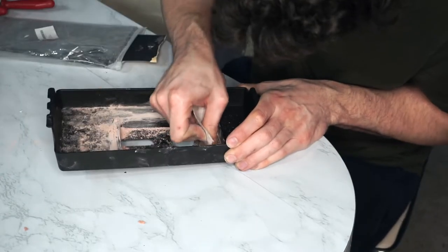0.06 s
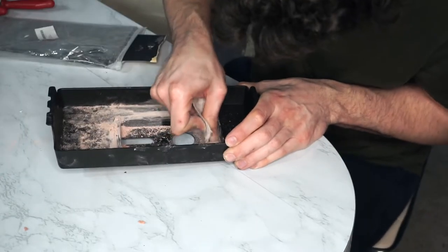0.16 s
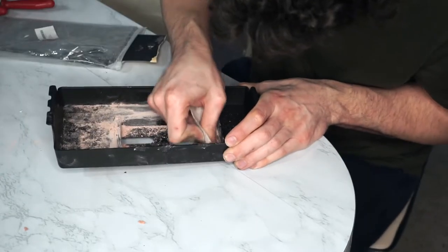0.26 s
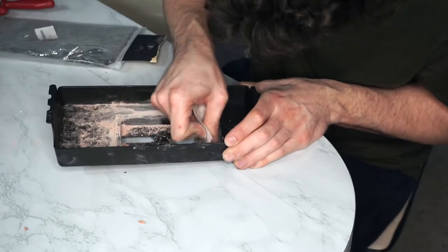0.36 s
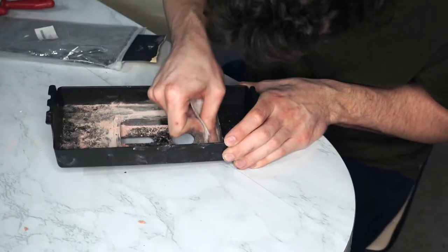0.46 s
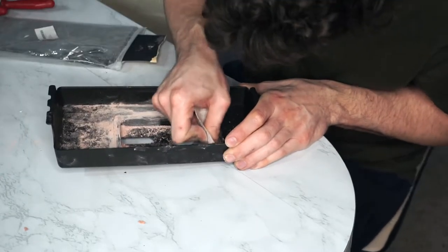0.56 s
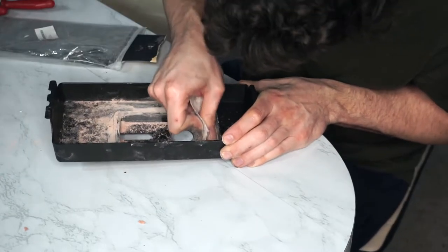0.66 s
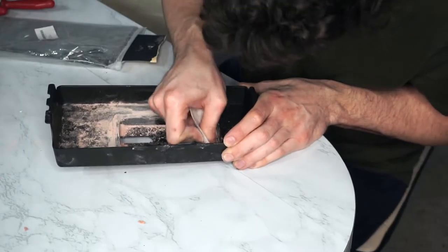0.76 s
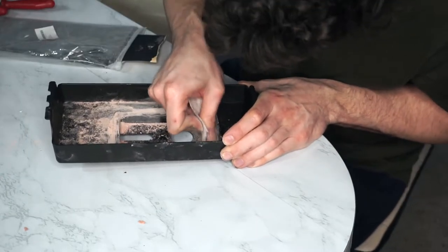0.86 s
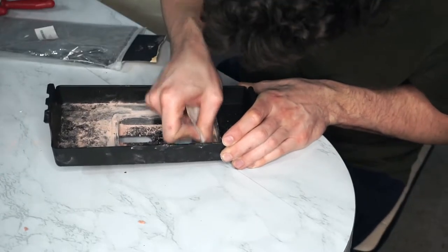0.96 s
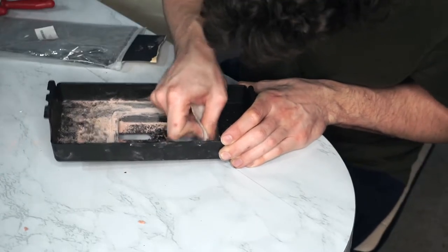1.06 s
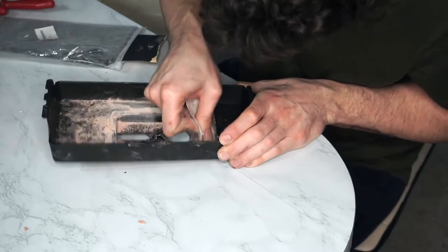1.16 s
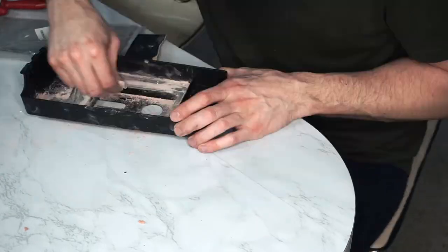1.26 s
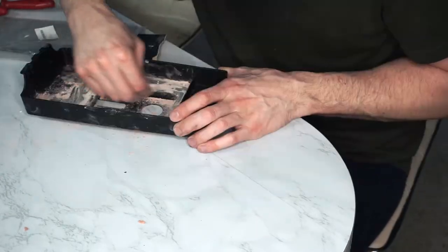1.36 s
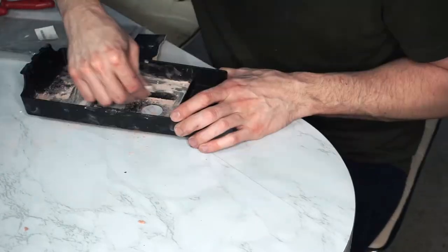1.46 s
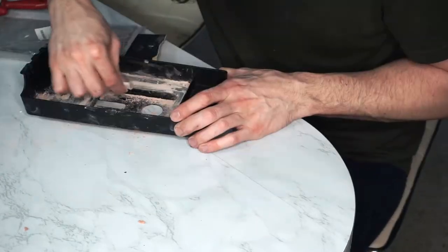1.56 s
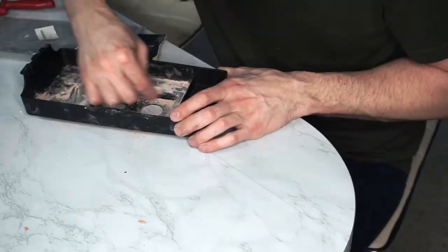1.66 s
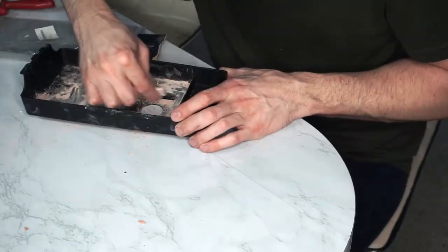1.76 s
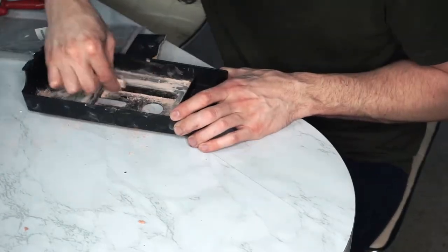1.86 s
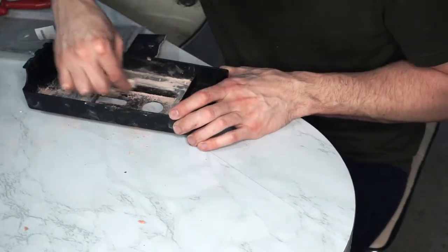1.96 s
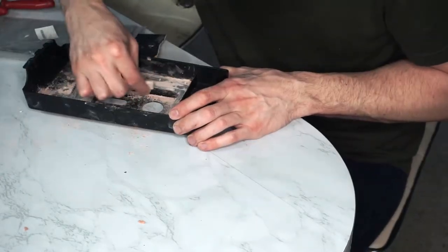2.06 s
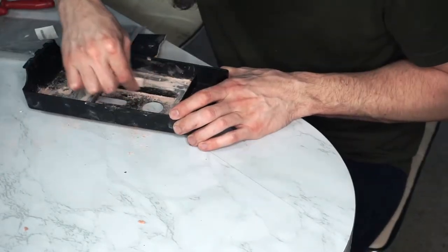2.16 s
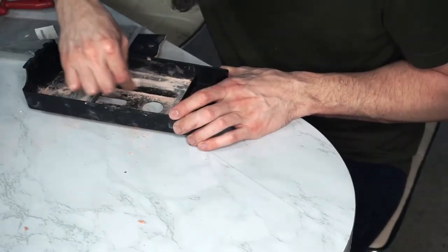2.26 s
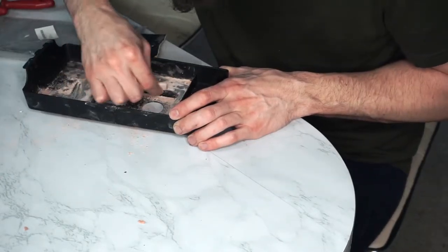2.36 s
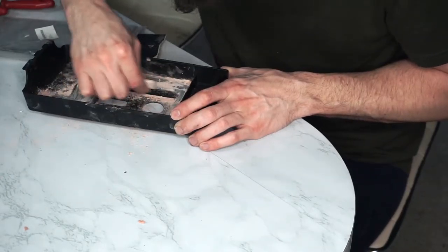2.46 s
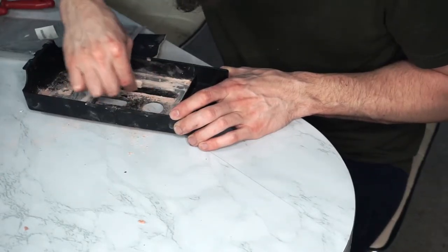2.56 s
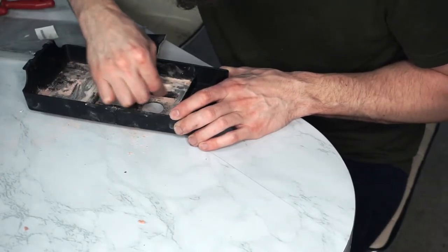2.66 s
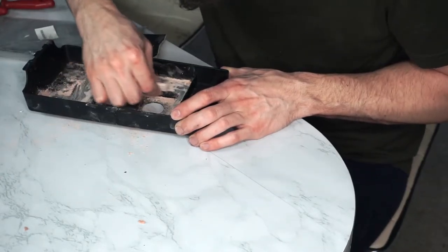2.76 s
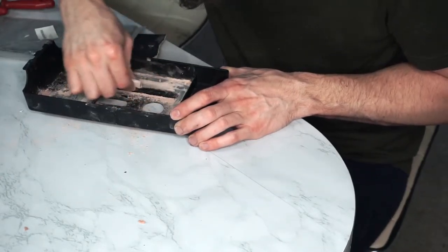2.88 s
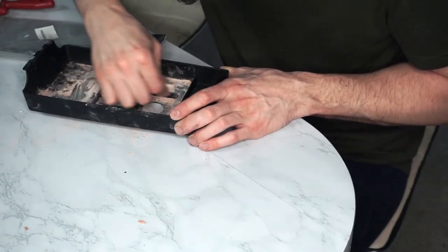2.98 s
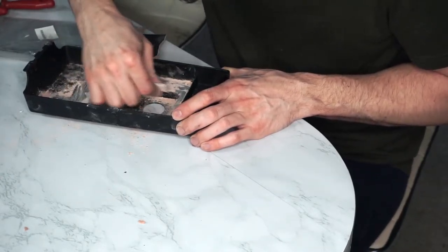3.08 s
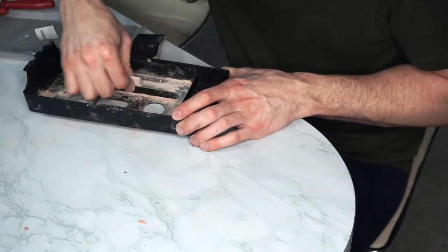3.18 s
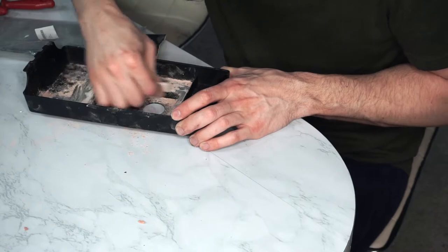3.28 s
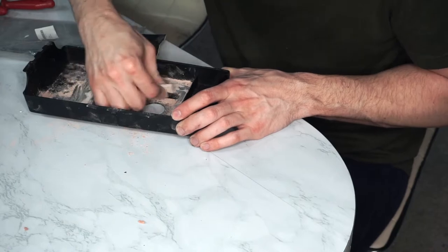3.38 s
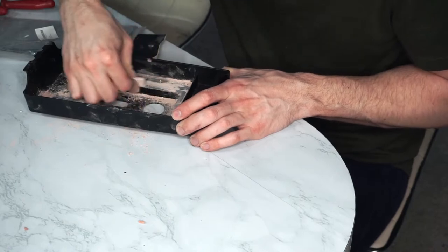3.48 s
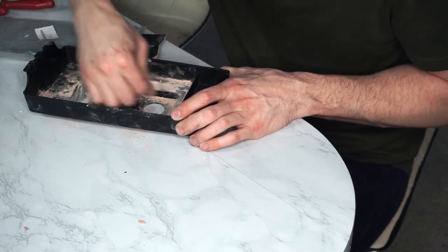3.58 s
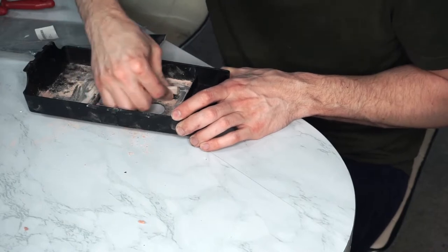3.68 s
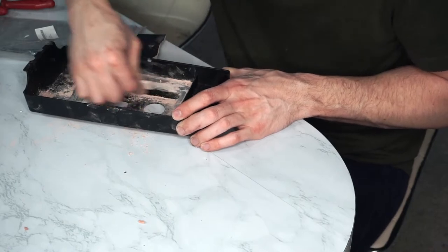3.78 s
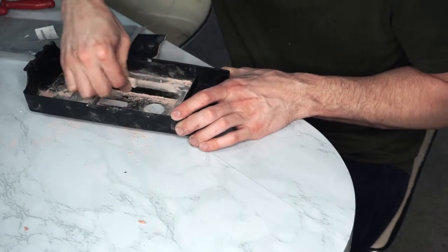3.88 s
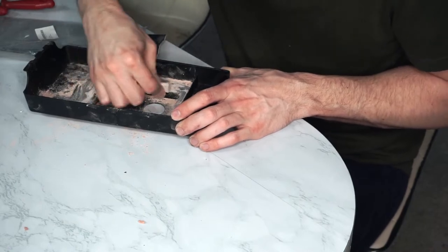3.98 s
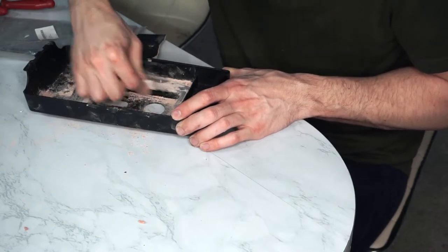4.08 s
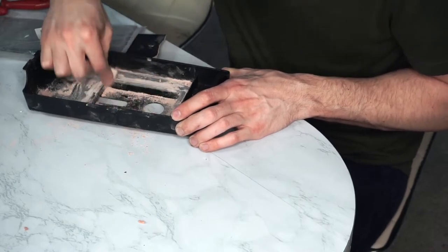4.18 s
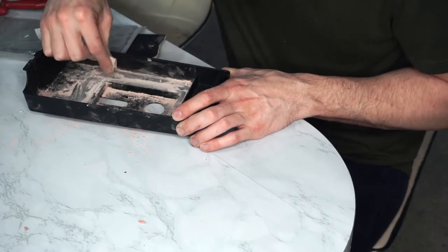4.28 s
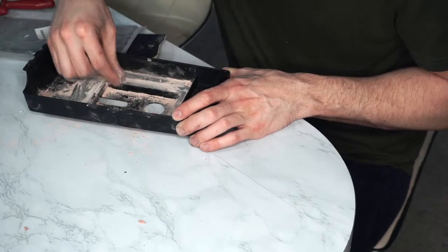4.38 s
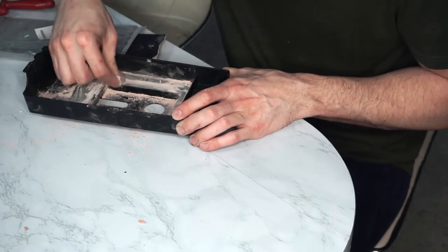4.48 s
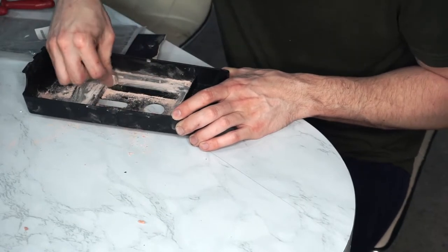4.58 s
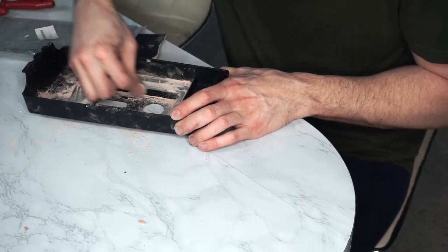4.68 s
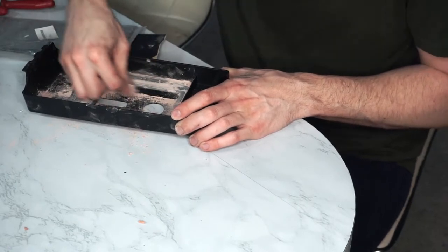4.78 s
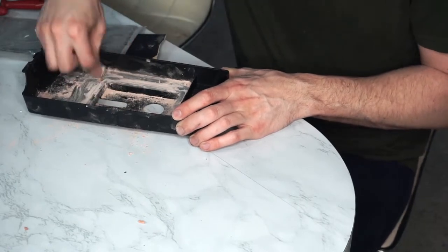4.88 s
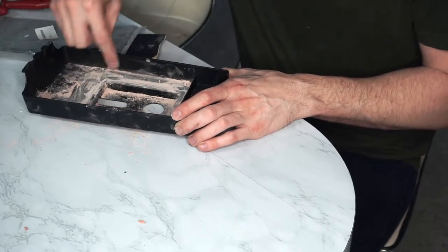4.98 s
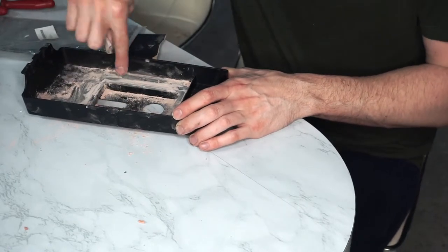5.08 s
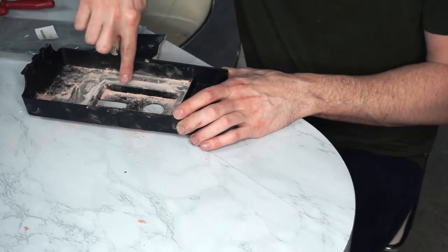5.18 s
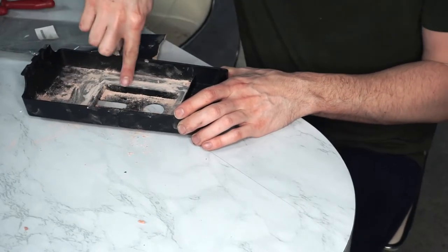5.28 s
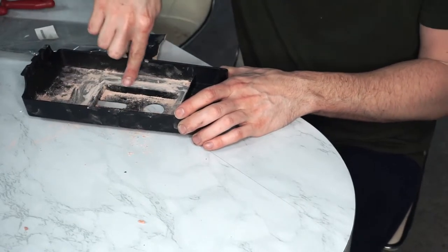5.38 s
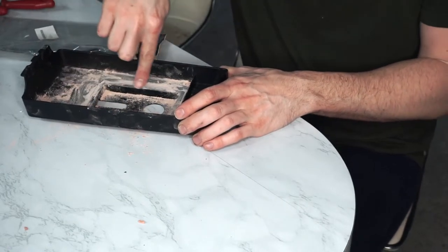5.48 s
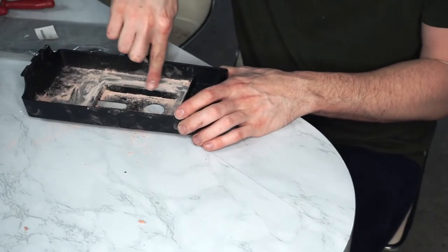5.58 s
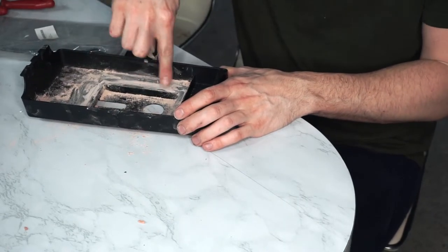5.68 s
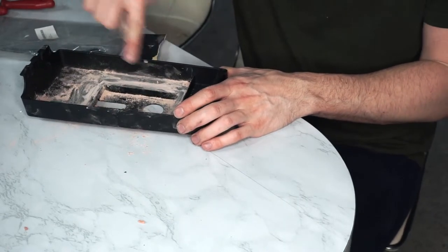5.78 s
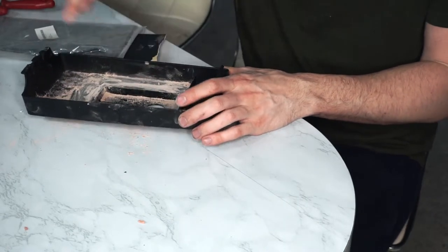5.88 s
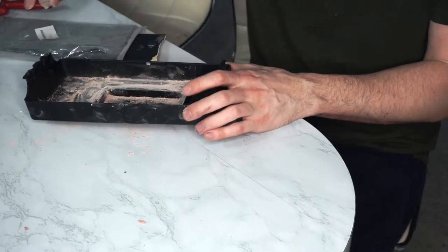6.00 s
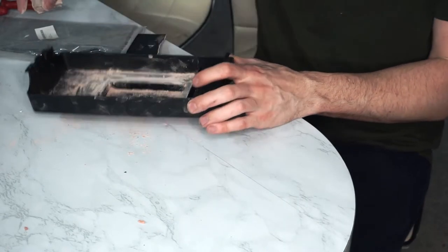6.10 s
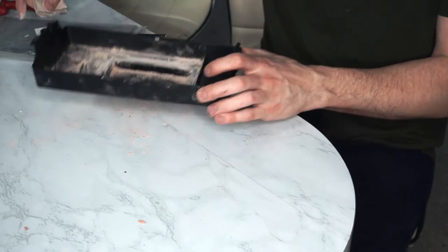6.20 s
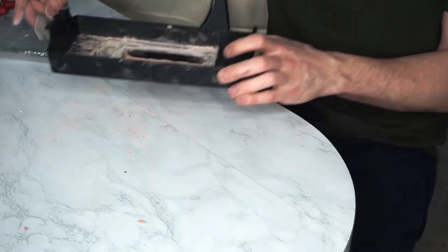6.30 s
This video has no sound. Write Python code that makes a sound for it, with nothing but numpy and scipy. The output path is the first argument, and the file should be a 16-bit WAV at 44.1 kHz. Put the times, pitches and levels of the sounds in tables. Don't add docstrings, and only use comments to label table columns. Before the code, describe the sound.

Sandpaper scrubs hard filler inside a thin plastic tray on a tabletop, miked closely. Light, quick scratches come first; a momentary dip leads to fuller, harsher to-and-fro rasping that rings the tray around a hollow midrange note. The tray grinds and bumps softly on the table. After a pause and a final pair of strokes, only tiny ticks, whispering fingertip slips and low room tone remain.

```python
import sys
import numpy as np
from scipy import signal
from scipy.fft import rfft, irfft
from scipy.io import wavfile
from scipy.ndimage import uniform_filter1d

SR = 44100
rng = np.random.default_rng(int(sys.argv[2]) if len(sys.argv) > 2 else 0)


def dump_mix(stems):
    frames = np.atleast_2d(stems).T
    limited = np.clip(frames, -1, 1)
    pcm = np.round(limited * 32767).astype(np.int16)
    wavfile.write(sys.argv[1], SR, pcm)


def voltage_ratio(decibels):
    exponent = np.asarray(decibels, float) / 20
    return 10 ** exponent


N = 279580
TIME = np.arange(N) / SR
TURN_S = 1.285
HUM_HZ = 60.3

# start in seconds, length in seconds, rasp level in dB,
# lean (under 1 starts fast), tray ring in dB.
SHORT_STROKES = [
    (0.019, 0.067, -44, 0.68, -16),
    (0.123, 0.088, -47, 1.5, -10),
    (0.24, 0.091, -38.5, 1.34, -13),
    (0.362, 0.096, -42, 1.45, -12),
    (0.499, 0.074, -39.5, 0.85, -9),
    (0.617, 0.081, -40, 1.08, -14),
    (0.741, 0.068, -38, 0.7, -11),
    (0.852, 0.066, -42, 0.95, -16),
    (0.97, 0.074, -36, 0.77, -5),
    (1.0965, 0.075, -36, 0.3, -3),
]
# start in seconds, length in seconds, rasp level in dB,
# lean (under 1 starts fast), tray ring in dB.
LONG_STROKES = [(1.319, 0.12, -32.5, 0.81, -7), (1.456, 0.14, -33.5, 1.18, -8),
                (1.62, 0.15, -29.5, 0.64, -14), (1.746, 0.21, -31.5, 0.76, -14),
                (1.92, 0.17, -35.5, 0.92, -3.5), (2.119, 0.12, -39, 1.04, -6),
                (2.288, 0.14, -33.5, 0.48, -6.5), (2.42, 0.15, -32, 1.17, -4.5),
                (2.571, 0.16, -33, 1, -12.5), (2.764, 0.14, -32, 0.88, -7.5),
                (2.915, 0.14, -30.5, 0.77, -13), (3.054, 0.17, -28.5, 1.13, -9),
                (3.253, 0.1, -29.5, 0.74, -10), (3.383, 0.15, -28.5, 1.18, -9.5),
                (3.57, 0.12, -31, 0.79, -13), (3.721, 0.16, -27, 1.22, -18),
                (3.915, 0.097, -28, 1.34, -12.5), (4.066, 0.17, -27.5, 0.79, -11.5),
                (4.417, 0.024, -44.5, 0.8, -28), (4.504, 0.1, -52, 1.8, -24),
                (4.625, 0.14, -30.5, 0.81, -14.5), (4.761, 0.17, -30, 1.11, -12)]
BAND_EDGES = [500, 1400, 2600, 3800, 5200, 7000, 9500, 12500, 17000]


def unit(x):
    return x / np.sqrt(np.mean(x ** 2))


def butter(x, order, hz, kind="low"):
    return signal.sosfilt(signal.butter(order, hz, kind, fs=SR, output="sos"), x)


def colour(x, points):
    hz, db = np.transpose(points)
    grid = np.maximum(np.arange(2049) * SR / 4096, 1)
    cepstrum = irfft(np.log(voltage_ratio(np.interp(np.log(grid), np.log(hz), db))))
    cepstrum[1:2048] *= 2
    cepstrum[2049:] = 0
    return signal.fftconvolve(x, irfft(np.exp(rfft(cepstrum))))[:len(x)]


def ring(x, hz, width):
    return signal.lfilter(*signal.iirpeak(hz, hz / width, fs=SR), x)


def walk(rate):
    hold = int(SR / rate)
    steps = np.repeat(rng.standard_normal(N // hold + 1), hold)
    return 1.716 * uniform_filter1d(steps, hold)[:N]


def body(x, modes, patchy_db=0.0):
    out = np.zeros(N)
    for k, (hz, width, db) in enumerate(modes):
        contact = voltage_ratio(patchy_db * np.minimum(walk(26), 1.2))
        out += (-1) ** k * voltage_ratio(db) * ring(x * contact, hz, width)
    return out


def curve(table):
    s, *columns = np.transpose(table)
    return [voltage_ratio(np.interp(TIME, s, c, left=-150, right=-150)) for c in columns]


def grit(scatter_db):
    size_db = scatter_db * np.minimum(rng.exponential(size=N), 3.5)
    return unit(rng.standard_normal(N) * voltage_ratio(size_db))


def tail(t60):
    t = np.arange(SR // 2) / SR
    h = rng.standard_normal(len(t)) * voltage_ratio(-60 * t / t60)
    return h / np.sqrt(np.sum(h ** 2))


def add(out, s, piece):
    i = int(s * SR)
    out[i:i + len(piece)] += piece[:N - i]


def patches(parts, patchy_db, rate, ceiling):
    out = np.zeros(N)
    for k, edge in enumerate(zip(BAND_EDGES, BAND_EDGES[1:])):
        wander = voltage_ratio(patchy_db * np.minimum(walk(rate), ceiling))
        out += (-1) ** k * butter(parts[k] * wander, 2, edge, "band")
    return out


def tray(push, before=None, after=None, patchy_db=0.0):
    # Hz, width in Hz, level in dB.
    first_modes = [(577, 17, -17), (1200, 74, 3), (1576, 83, 4.5), (1850, 274, 6.5), (2045, 400, 2)]
    turned_modes = [(706, 175, -6.5), (975, 126, -1.5), (1168, 132, 3.5), (1311, 106, 1.5), (1435, 48, -4),
                    (1550, 180, -5.5), (2176, 185, -5.5), (2400, 190, -18.5)]
    before = first_modes if before is None else before
    after = turned_modes if after is None else after
    first = np.arange(N) < TURN_S * SR
    return body(push * first, before, patchy_db) + body(push * ~first, after, patchy_db)


def air():
    # Hz, density in dB per Hz.
    room_tone = [(18, -53), (30, -23), (98, -20), (125, -4), (479, -4), (561, 0), (622, -3), (1200, -8),
                 (1870, -17), (4910, -21), (9940, -29), (13300, -33), (15500, -36)]
    # Hz, gain in dB.
    side_tilt = [(60, -4), (110, -18.5), (200, -14.5), (380, -10), (700, -11), (1290, -15.5), (2380, -2),
                 (4400, -1.5), (8120, -2), (15000, 1)]
    # Hz, level in dB.
    whine_tones = [(9711, -90), (12947, -90)]
    level_db = -62
    mid = unit(colour(rng.standard_normal(N), room_tone)) * voltage_ratio(level_db + 0.39 * walk(4.7))
    side = colour(unit(colour(rng.standard_normal(N), room_tone)) * voltage_ratio(level_db), side_tilt)
    whine = sum(voltage_ratio(db) * np.sin(2 * np.pi * hz * TIME) for hz, db in whine_tones)
    whine *= 1 + np.sin(2 * np.pi * HUM_HZ * TIME)
    return mid + whine, side


def shoves():
    # time in seconds, scrape in dB, table rumble in dB.
    hold_weight = [
        (0, -50, -60.5),
        (1.26, -49, -64.5),
        (1.29, -60, -79),
        (1.33, -42, -62.5),
        (2.7, -46.5, -65.5),
        (3.1, -44.5, -66),
        (3.6, -56, -65.5),
        (5.0, -55, -60.5),
        (6.3, -72, -94),
    ]
    # time in seconds, scrape in dB, table rumble in dB.
    shove_peaks = [(0.04, -48, -70), (0.16, -52, -72), (0.281, -41, -66), (0.549, -38.5, -62),
                   (0.788, -41, -62), (0.99, -35.5, -64), (1.16, -77, -52.5), (1.37, -45, -59),
                   (1.52, -66, -53), (1.68, -38.5, -52), (1.872, -38, -68), (2.03, -56, -59),
                   (2.19, -42.5, -68), (2.37, -51, -56), (2.52, -57, -73), (2.68, -41, -65),
                   (2.82, -57, -60), (3.0, -43, -63), (3.1, -52, -66), (3.309, -39.5, -77),
                   (3.42, -37, -74), (3.65, -42, -70), (3.758, -38, -69), (3.98, -50, -62), (4.1, -41, -66),
                   (4.45, -46, -50), (4.87, -46, -69)]
    rise_s, fall_s = 0.021, 0.015
    scrape, rumble = curve(hold_weight)
    for s, scrape_db, rumble_db in shove_peaks:
        bump = np.exp(-np.where(TIME < s, (s - TIME) / rise_s, (TIME - s) / fall_s))
        scrape = scrape + voltage_ratio(scrape_db) * bump
        rumble = rumble + voltage_ratio(rumble_db) * bump
    return scrape, rumble


def shuffle():
    # Hz, width in Hz, level in dB.
    table_modes = [(73.6, 14, -23), (133, 14, -0.5), (150, 20, -2), (190.3, 14, 0.5)]
    underside = [(309, 92, -4.0), (444.0, 61, 2.5), (550.0, 152, 5.5), (662, 395, 0.5)]  # Hz, width Hz, dB
    scrape, rumble = shoves()
    grind = body(grit(scatter_db=0.5), underside, patchy_db=3.0)
    boom = body(rng.standard_normal(N), table_modes)
    hum_db = -75 - 2.5 * TIME + walk(3.4)
    hum = voltage_ratio(hum_db) * np.sin(2 * np.pi * HUM_HZ * TIME)
    return voltage_ratio(-6.0) * scrape * unit(grind) + voltage_ratio(-8.5) * rumble * unit(boom) + hum


def wipe():
    # time in seconds, low ring in dB, high ring in dB, hiss in dB.
    finger_path = [
        (5.43, -75, -85, -78),
        (5.464, -57, -58.5, -69),
        (5.505, -62, -70, -77),
        (5.56, -60, -56, -70),
        (5.6, -63, -75, -88),
        (5.66, -53, -59, -57),
        (5.692, -83, -77, -80),
        (5.71, -72, -96, -70),
    ]
    low, high, hiss = curve(finger_path)
    slip = grit(scatter_db=2.5) * voltage_ratio(1.5 * walk(70))
    low_ring = unit(ring(ring(slip, 1180, 150), 1180, 160))
    high_ring = unit(ring(ring(slip, 2170, 300), 2170, 300))
    skin_hiss = unit(ring(ring(slip, 3400, 2600), 3900, 2600))
    return low * low_ring + high * high_ring + hiss * skin_hiss


def brush():
    # time in seconds, level in dB.
    brush_path = [
        (4.522, -72),
        (4.54, -50.5),
        (4.555, -45),
        (4.566, -40),
        (4.572, -47),
        (4.579, -42),
        (4.587, -40.5),
        (4.594, -60),
        (4.625, -68),
    ]
    # Hz, width in Hz, level in dB.
    rim_modes = [(3120, 350, 0.5), (3900, 330, -6), (4800, 390, -1.5), (6200, 390, 1.5), (7500, 600, -9),
                 (9650, 580, -6), (10900, 700, -14)]
    thin = butter(body(grit(scatter_db=5.0), rim_modes), 4, 2700, "high")
    return curve(brush_path)[0] * unit(thin)


def ticks():
    # time in seconds, peak in dB, pitch in Hz.
    tick_events = [(1.449, -46, 11000), (1.4575, -47, 10500), (1.47, -43, 11500), (1.496, -42, 12000),
                   (5.656, -54, 4400), (5.713, -55, 5700), (5.462, -50, 2150), (5.1198, -47, 6600),
                   (5.1304, -48, 4740), (5.1855, -39.5, 5080), (5.7414, -47, 6560), (5.8321, -51, 3520),
                   (5.99, -43, 5070), (6.2706, -55, 4800), (6.278, -49, 5170)]
    out, t = np.zeros(N), np.arange(500) / SR
    for s, db, hz in tick_events:
        click = 0.97 * rng.standard_normal(500) * np.exp(-t / 0.0013)
        pair = np.sin(2 * np.pi * hz * t) + 0.73 * np.sin(2 * np.pi * 1.245 * hz * t)
        envelope = np.exp(-t / 0.0022) * (1 - np.exp(-t / 0.00034))
        add(out, s, voltage_ratio(db - 6.5) * (pair + click) * envelope)
    return out


def knocks():
    # time in seconds, peak in dB, pitch in Hz, t60 in seconds, tray ring in dB.
    knock_events = [(0.974, -31.5, 1850, 0.026, 19.5), (1.098, -27, 1600, 0.04, 1),
                    (1.872, -20, 991, 0.049, 15), (1.877, -16.5, 1210, 0.014, 18.5),
                    (4.192, -46, 1200, 0.049, -19), (4.4315, -13, 450, 0.015, 5),
                    (4.431, -30, 994, 0.048, 1), (4.45, -44, 1000, 0.08, 14), (4.861, -27, 1310, 0.027, 13),
                    (4.877, -21, 880, 0.015, -3), (4.94, -29, 1420, 0.019, 0),
                    (6.326, -39, 1860, 0.022, -1)]
    note, jolt, t = np.zeros(N), np.zeros(N), np.arange(5000) / SR
    for s, db, hz, t60, ring_db in knock_events:
        hollow = np.sin(2 * np.pi * hz * t) + 0.5 * np.sin(2 * np.pi * 1.37 * hz * t)
        add(note, s, voltage_ratio(db - 2.5 - 60 * t / t60) * hollow * (1 - np.exp(-t / 0.0013)))
        slap = uniform_filter1d(rng.standard_normal(5000), size=11) * np.exp(-t / 0.0013)
        add(jolt, s, voltage_ratio(db + ring_db) * slap)
    return butter(note, 1, 80, "high") + tray(jolt)


def chatter():
    # time in seconds, level in dB,
    # width in seconds.
    chatter_swells = [(1.018, -39.5, 0.059), (1.12, -51.5, 0.043), (1.396, -43, 0.038), (1.513, -35, 0.03),
                      (1.675, -39, 0.064), (1.737, -35, 0.014), (1.77, -35, 0.016), (1.815, -32, 0.012),
                      (1.879, -36.5, 0.039), (1.986, -45, 0.013), (2.02, -41, 0.031), (2.204, -40, 0.039),
                      (2.307, -39, 0.013), (2.354, -33, 0.011), (2.46, -31.5, 0.045), (2.513, -37, 0.01),
                      (2.644, -33.5, 0.045), (2.84, -28, 0.024), (2.949, -34, 0.016), (2.99, -36, 0.019),
                      (3.095, -30, 0.014), (3.136, -28, 0.044), (3.301, -40, 0.042), (3.44, -30, 0.033),
                      (3.655, -39, 0.064), (3.808, -34, 0.029), (4.001, -30.5, 0.055), (4.104, -29, 0.023),
                      (4.2, -39, 0.046), (4.439, -39, 0.017), (4.694, -36, 0.078), (4.866, -36.5, 0.035),
                      (1.915, -31, 0.05),
        (2.399, -37, 0.008),
        (3.181, -31.5, 0.034),
        (3.772, -40, 0.015),
        (4.235, -41, 0.037),
        (4.942, -39, 0.0078),
    ]
    swell = np.zeros(N)
    for s, db, width in chatter_swells:
        swell += voltage_ratio(db) * np.exp(-((TIME - s) / (0.46 * width)) ** 2)
    pitch = 1178 + 22 * walk(70)
    note = np.sin(2 * np.pi * np.cumsum(pitch) / SR)
    return voltage_ratio(-3.0 + 2.0 * np.minimum(walk(130), 1)) * swell * note


def catches():
    # time in seconds, peak in dB, pitch in Hz, tray ring in dB, rise in ms.
    snags = [(0.1106, -42.5, 2030, -7.5, 1.2), (0.5339, -25, 7600, -20, 3.5), (0.277, -33, 4900, -22, 1.5),
             (0.292, -27, 5000, -20, 2.2), (1.103, -23, 3400, -15, 1.9), (1.727, -20, 4900, -25, 1.3),
             (1.823, -24, 6000, -22, 0.5), (4.877, -15, 2660, -15, 1.16), (4.809, -25, 2200, -16, 1.2),
             (1.1115, -22.5, 2010, -2, 1.5), (1.7268, -17.5, 6650, -21, 1.3), (1.771, -27, 4620, -15, 2.1),
             (1.8352, -18.5, 3980, -32, 3.5), (1.8642, -15, 2770, -33, 6.1), (2.395, -26, 2060, -3, 1.5),
             (2.396, -29, 5500, -30, 1.5), (2.177, -26, 2200, -12, 1.5), (2.492, -22, 2150, -20, 1.5),
             (2.4415, -14, 2840, -34, 6.2), (2.4405, -17, 5000, -24, 2.1), (2.4425, -18, 3800, -27, 2.3),
             (3.0704, -24, 4340, -7, 1.8), (3.77, -25.5, 1800, 1.5, 1.05), (4.1945, -18, 3900, -5.5, 0.78),
             (4.8744, -16.5, 6200, -6, 1.55), (4.9392, -23, 4170, -9, 0.76)]
    # time in seconds, peak in dB, pitch in Hz.
    edge_bites = [(0.2634, -30, 3030), (0.37, -38, 7600), (0.5115, -30, 2880), (0.753, -37, 4030),
                  (0.975, -26, 3330), (1.0974, -24, 3360), (1.335, -38, 4900), (1.6316, -31, 3070),
                  (2.153, -29, 2650), (2.29, -29, 1970), (2.759, -27.5, 6500), (2.933, -43, 3700),
                  (3.257, -23, 6900), (3.391, -32, 4470), (3.583, -32, 4000), (3.7259, -27, 4600),
                  (3.9247, -36, 4300), (4.061, -33, 7000), (2.924, -34, 4000), (2.272, -38, 4000),
                  (4.4208, -32, 7600), (4.425, -46, 6300), (4.524, -36, 9700), (4.325, -52, 6000),
                  (2.134, -37, 5000), (4.638, -42, 4000), (4.785, -24, 2400)]
    crack, jolt = np.zeros(N), np.zeros(N)
    ms = np.arange(1200) / SR * 1000
    bites = [(s, db, hz, -38, 1.7) for s, db, hz in edge_bites]
    for s, db, hz, ring_db, rise in snags + bites:
        burst = rng.standard_normal(1200) * np.sqrt(ms / rise) * np.exp(1 - ms / rise)
        snap = ring(burst, hz, 0.14 * hz) + 0.15 * burst
        add(crack, s, voltage_ratio(db - 0.5) * snap / np.max(np.abs(snap)))
        add(jolt, s, voltage_ratio(db + ring_db + 14.5) * burst)
    return butter(crack, 3, [1300, 11500], "band") + tray(jolt)


def passes():
    # time in seconds, sharpness in dB.
    freshness = [(0.1, 0), (0.27, -7), (0.75, -3), (0.87, -11), (1.35, -5.5), (1.55, -5.5), (2.6, -10.5),
                 (3.3, -6.5), (4.1, -5), (4.5, -7), (4.62, -3.5), (4.8, -4.5)]
    # start in seconds, length in seconds,
    # rasp level in dB, dullness in dB, tray ring in dB.
    light_drags = [(2.544, 0.095, -48, -5, -22), (0, 0.025, -62.5, 9, 6), (0.078, 0.09, -60, 22, -16),
                   (0.566, 0.066, -48.5, 18, -16), (0.897, 0.13, -58, 22, -5),
                   (1.275, 0.094, -48, 8, -12.5), (1.121, 0.11, -53.5, 11, -2.5),
                   (1.418, 0.081, -47.5, -4, -12), (1.573, 0.11, -49, -3, -6),
                   (2.197, 0.15, -49.5, -1.5, -34), (3.213, 0.11, -38.5, 19, -36),
                   (3.332, 0.069, -47, 32, -30), (3.967, 0.07, -40.5, 45, -3),
                   (4.75, 0.094, -49, -4, -19.5), (4.921, 0.033, -40, 16, -7)]
    rows = []
    for s, length, db, lean, ring_db in SHORT_STROKES + LONG_STROKES:
        rows.append((s, length, db, lean, np.interp(s, *np.transpose(freshness)), ring_db))
    for s, length, db, dull_db, ring_db in light_drags:
        sharp_db = np.interp(s, *np.transpose(freshness)) - dull_db
        rows.append((s, length, db, 0.67, sharp_db, ring_db))
    return rows


def hand_motion():
    # time in seconds, peak in dB.
    grips = [(0.0293, -28), (0.1545, -35), (0.249, -40), (0.265, -28), (0.404, -21.5), (0.5112, -36),
             (0.5345, -26), (0.6384, -36), (0.7503, -23), (0.87, -26), (0.976, -25), (1.0974, -16),
             (1.3294, -23), (1.503, -24), (1.6287, -24.5), (1.761, -24), (1.837, -7), (2.153, -14),
             (2.177, -21.5), (2.2902, -30), (2.4274, -15), (2.442, -17), (2.604, -24), (2.7791, -31),
             (2.9347, -27), (3.0723, -14), (3.2565, -27), (3.4032, -30), (3.5804, -25), (3.7259, -32),
             (3.7574, -25), (3.9255, -30), (3.9459, -30), (4.094, -19), (1.7995, -23), (4.6362, -27),
             (4.651, -18.5), (4.785, -27)]
    speed, sharp, keen, push = np.zeros((4, N))
    for s, length, db, lean, sharp_db, ring_db in passes():
        phase = np.linspace(0, 1, int(length * SR))
        arc = np.sin(np.pi * phase ** np.clip(lean, 0.2, 3))
        arc = np.tanh(arc / 0.85) * 1.16
        late = np.sin(np.pi * phase ** np.clip(1.15 * lean, 0.2, 3))
        add(speed, s, voltage_ratio(db) * arc ** 1.87)
        add(sharp, s, voltage_ratio(db + sharp_db - 7) * arc ** 3.7)
        add(sharp, s, voltage_ratio(db + sharp_db - 4) * late ** 2.6)
        add(keen, s, voltage_ratio(db + sharp_db) * late ** 2.6)
        add(push, s, voltage_ratio(db + ring_db) * arc ** 1.26)
    fade = np.exp(-np.arange(SR // 8) / SR / 0.021)
    for s, db in grips:
        for drive, share_db in ((speed, 0.5), (sharp, -9), (keen, -11), (push, -12)):
            add(drive, s, voltage_ratio(db - 22 + share_db) * fade)
    return speed, sharp, keen, push


def shell(rasp):
    t60_s, streak_db = 0.04, -3
    turn = 1.56 * walk(14)
    streaks = np.zeros(N)
    for share in (np.cos(turn), np.sin(turn)):
        streaks += signal.fftconvolve(rasp * share, tail(t60_s)[:4096])[:N]
    return (rasp + voltage_ratio(streak_db) * streaks) / np.hypot(1, voltage_ratio(streak_db))


def spots(force):
    # panel Hz, panel dB, rib Hz, rib dB.
    spot_modes = [(2050, -2, 3000, -29), (2000, -5, 3600, 0), (1870, 7.5, 5200, -11), (2010, 1, 3320, -5),
                  (1850, -7, 3200, -17), (2170, 4, 3400, -8), (2000, -6, 4600, -8), (2210, 4.5, 3300, -11),
                  (1890, 2, 3800, -1), (1980, -10, 3240, -3.5), (2500, -12, 4640, 1), (2200, -21, 2200, 0),
                  (2110, -13, 3400, -24), (2460, -7, 4800, -10), (2200, -18, 5700, -7),
                  (2270, 4.5, 3500, -30), (2130, -29, 4300, -6), (2350, 4, 3000, -3), (2250, -21, 1900, -1),
                  (2150, -20, 3060, -2), (2250, -17, 3150, -11), (1680, 2.5, 2920, -1),
                  (2010, -16, 3360, -21), (1770, -22, 2940, -4), (1780, 1.5, 5400, -9),
                  (1710, -3, 2970, -18), (2500, -14, 3300, -3), (2400, -3.5, 2700, -11),
                  (2070, -12, 4100, -9), (1626, -11, 3400, 0), (2040, 1.5, 4540, -6), (2230, 2, 3150, -5.5)]
    # Hz, level in dB.
    paper_folds = [(7740, -4), (7740, 0), (7800, -9), (8500, -4.5), (8900, -2.5), (7460, -16), (8530, -5),
                   (7700, -8), (7600, -25), (7200, -8.5), (9800, -14), (8200, -8), (7060, -9),
                   (9100, -13.5), (9250, -22), (7340, -8.5), (9700, -10), (10500, -14), (8140, -12),
                   (10200, -11), (7000, -13), (8250, -5), (10400, -11), (8500, -5), (10250, -18),
                   (8360, -7.5), (9900, -9), (7200, -11), (6300, 6), (9650, -6.5), (8000, -4), (6250, -15)]
    sharpness = 18
    out = np.zeros(N)
    for stroke, spot, fold in zip(SHORT_STROKES + LONG_STROKES, spot_modes, paper_folds):
        s, length = stroke[:2]
        panel_hz, panel_db, rib_hz, rib_db = spot
        piece = force[int(s * SR):int((s + length) * SR)]
        for hz, db in ((panel_hz, panel_db), (rib_hz, rib_db), fold):
            add(out, s, voltage_ratio(db) * ring(piece, hz, hz / sharpness))
    return out


def sanding():
    # Hz, density in dB per Hz.
    rasp_colour = [(240, -31), (400, -37.5), (839, -14.5), (1160, -11), (1840, -7.5), (2590, -4.5),
                   (3120, -2), (4240, -4.5), (8370, -7.5), (12500, -20.5), (16000, -30)]
    # Hz, width in Hz, level in dB.
    ribs_first = [(3280, 350, -1), (3980, 150, -0.5), (4950, 910, -2), (6600, 580, 0), (7600, 430, -3)]
    ribs_turned = [(3090, 200, -3.5), (3550, 220, -11), (4720, 260, -6), (5500, 300, -12), (6750, 350, -12),
                   (8300, 350, -12)]
    speed, sharp, keen, push = hand_motion()
    bite = voltage_ratio(np.minimum(0.8 * walk(60) + 1.2 * walk(250), 1.2))
    crumbs = (rng.random(N) < 400 / SR) * rng.uniform(-0.6, 1, N)
    rasp = unit(colour(grit(scatter_db=0.0) + voltage_ratio(14.5) * crumbs, rasp_colour)) * bite
    drives = [push * voltage_ratio(13.5), push * voltage_ratio(3.5) + speed * voltage_ratio(-4.0), speed, speed, speed,
              sharp * voltage_ratio(7.5), sharp * voltage_ratio(12.0), keen * voltage_ratio(9.0)]
    open_air = patches([rasp * drive for drive in drives], patchy_db=1.5, rate=35, ceiling=0.69)
    shake = grit(scatter_db=2.5) * bite
    ribs = tray(shake * speed, ribs_first, ribs_turned, patchy_db=5.0)
    panels = tray(shake * push, patchy_db=2.5)
    return voltage_ratio(-3.7) * shell(open_air) + voltage_ratio(5) * ribs + voltage_ratio(8.5) * spots(shake * speed) + voltage_ratio(14.0) * panels


def scene():
    # Hz, level in dB.
    port_spread = [(25, -30), (60, -11), (110, -11), (200, -13), (380, -16), (700, -20), (1290, -28),
                   (2380, -22), (4400, -14), (8120, -10), (15000, -11)]
    mid_air, side_air = air()
    low = shuffle()
    near = wipe() + brush() + ticks() + knocks() + catches() + sanding()
    hollow = chatter()
    echo = np.concatenate([np.zeros(250), tail(0.3)])
    room_colour = [(300, -11.5), (1200, 6.5), (3000, 1), (8000, -1.0), (15000, -22.5)]  # Hz, dB
    wet = signal.fftconvolve(colour(near, room_colour), echo)[:N]
    mid = near + hollow + voltage_ratio(-11.5) * wet + low + mid_air
    scattered = signal.fftconvolve(near + hollow + low, tail(0.28))[:N]
    askew = voltage_ratio(-0.5) * colour(scattered, port_spread)
    bass = butter(askew, 2, 600)
    shaded = patches([askew] * len(BAND_EDGES), patchy_db=16, rate=16, ceiling=0)
    side = bass + shaded + side_air - 0.05 * mid_air
    dip = voltage_ratio(-13 * np.exp(-((TIME - TURN_S) / 0.0092) ** 2))
    return np.array([mid + side, mid - side]) * dip


def top_cut(x):
    return signal.sosfilt(signal.butter(12, 16470, fs=SR, output="sos"), x)


def record(dry):
    mic = butter(dry, 2, 45, "high")
    mic = signal.sosfilt(signal.ellip(8, 0.3, 55, 15550, fs=SR, output="sos"), mic)
    return top_cut(mic)


dry = scene()
out = record(dry)
dump_mix(out)
```